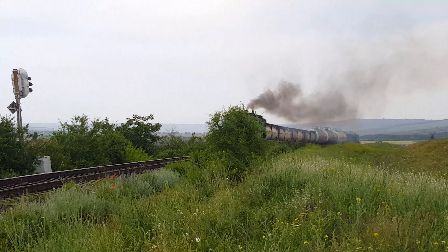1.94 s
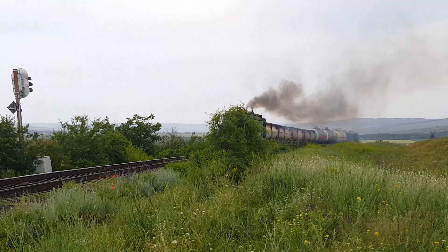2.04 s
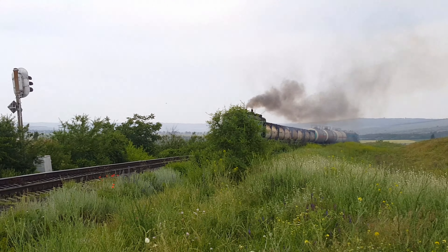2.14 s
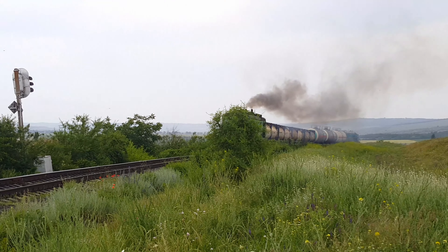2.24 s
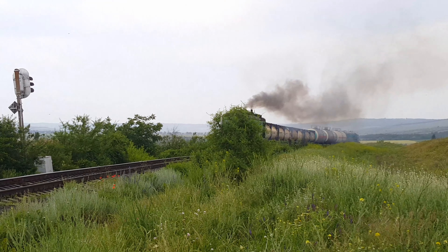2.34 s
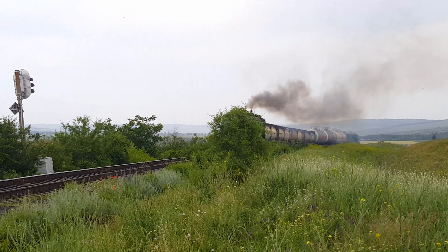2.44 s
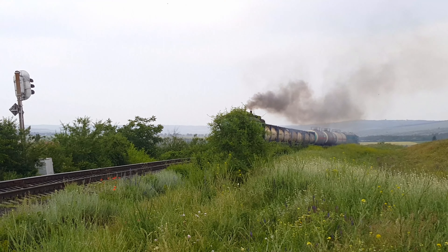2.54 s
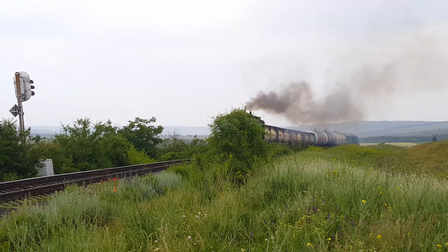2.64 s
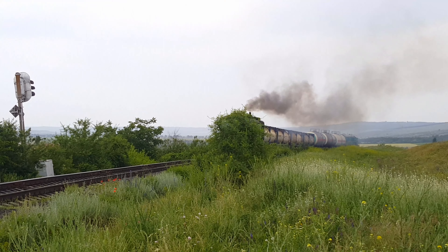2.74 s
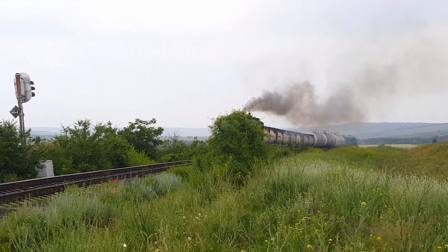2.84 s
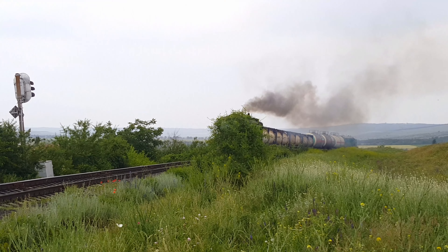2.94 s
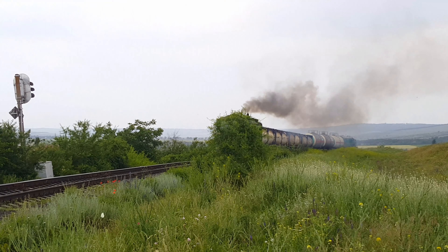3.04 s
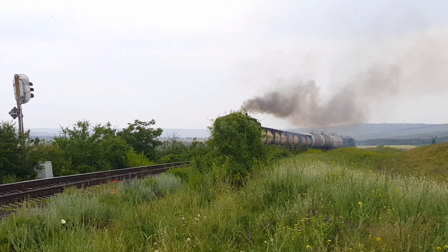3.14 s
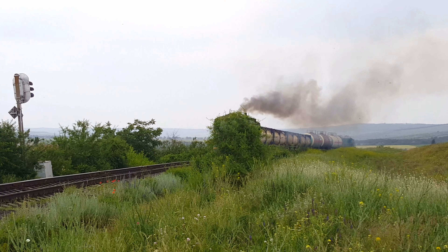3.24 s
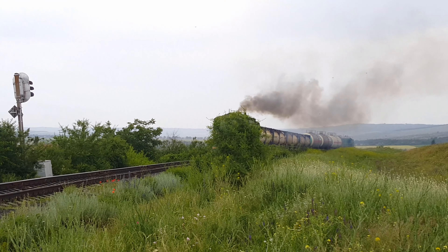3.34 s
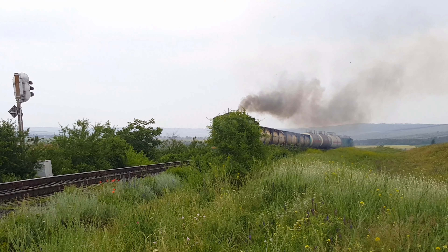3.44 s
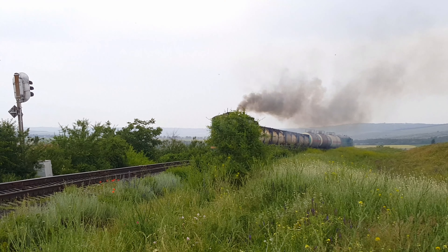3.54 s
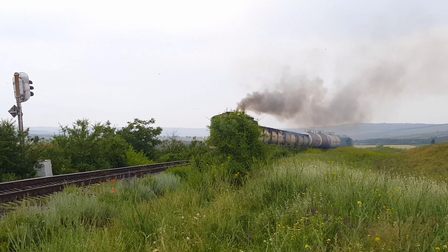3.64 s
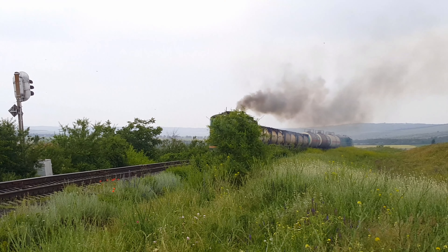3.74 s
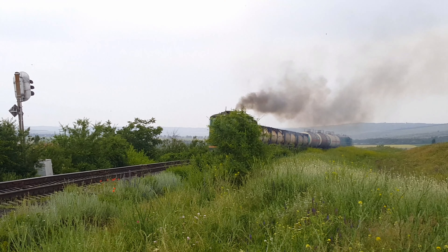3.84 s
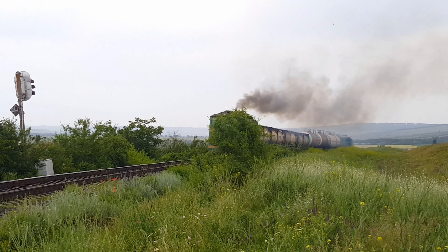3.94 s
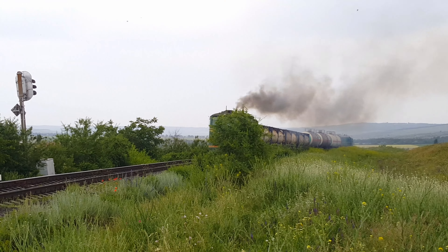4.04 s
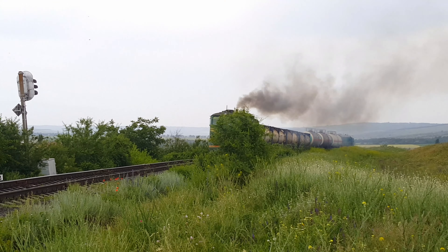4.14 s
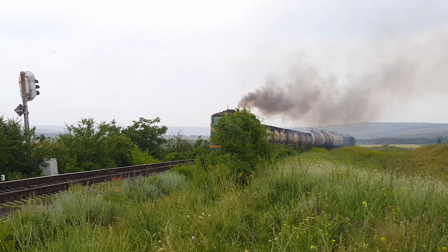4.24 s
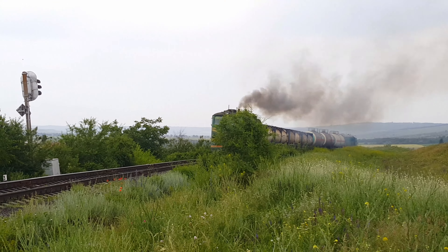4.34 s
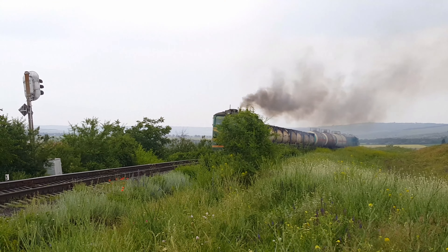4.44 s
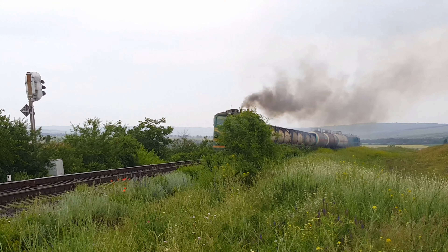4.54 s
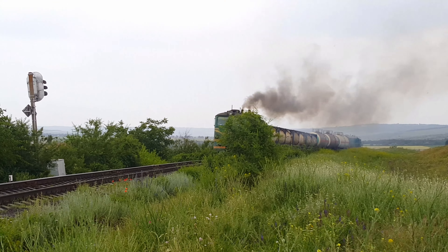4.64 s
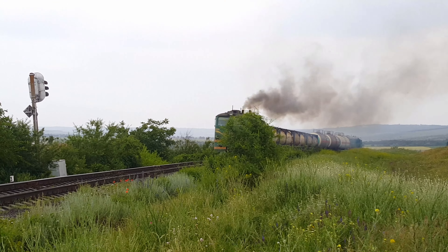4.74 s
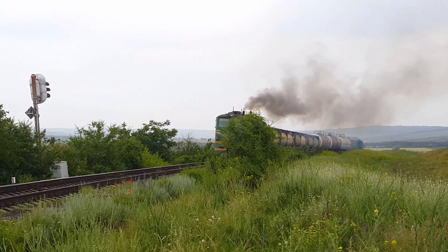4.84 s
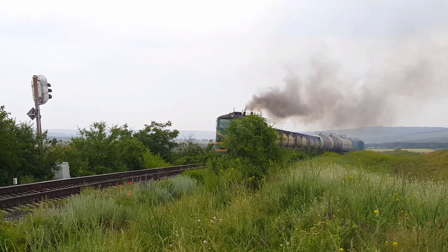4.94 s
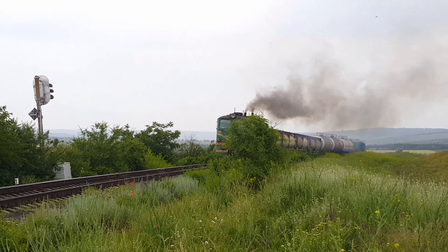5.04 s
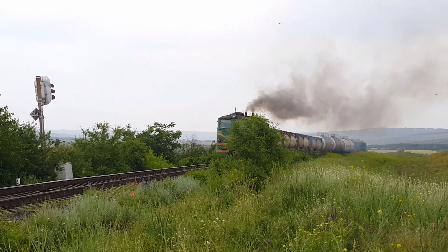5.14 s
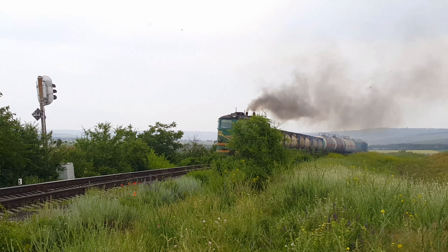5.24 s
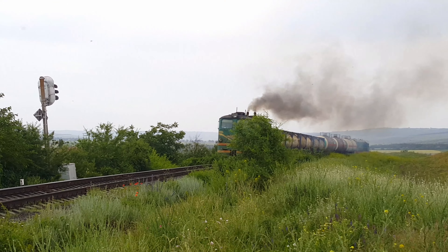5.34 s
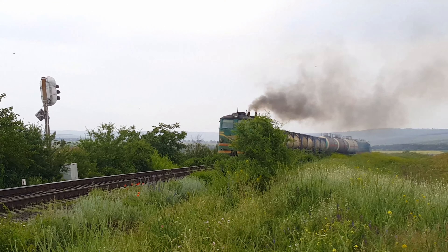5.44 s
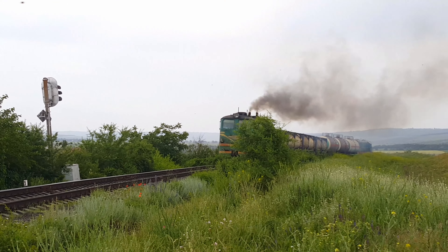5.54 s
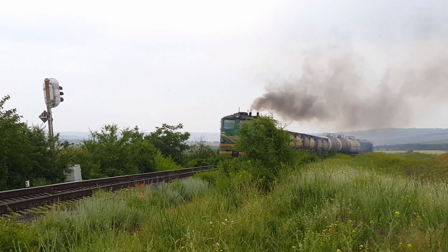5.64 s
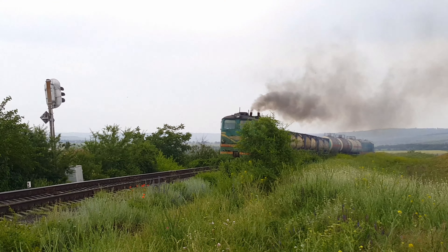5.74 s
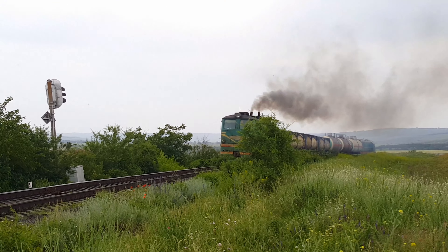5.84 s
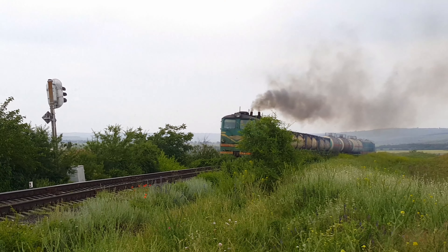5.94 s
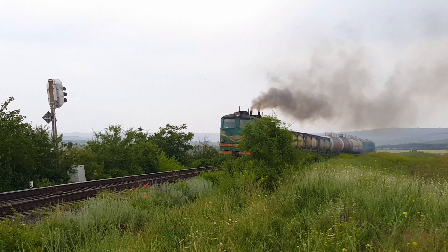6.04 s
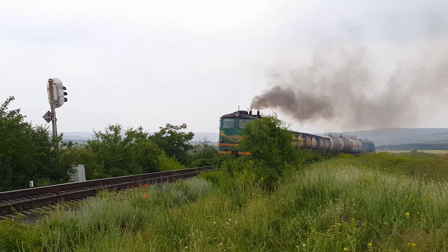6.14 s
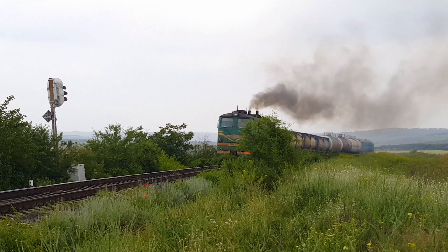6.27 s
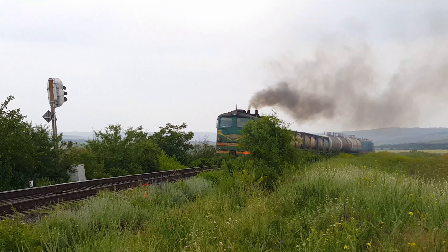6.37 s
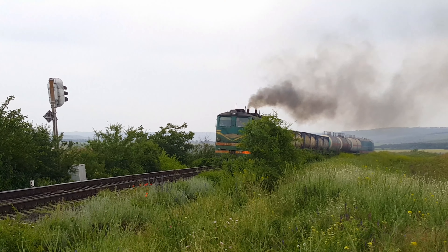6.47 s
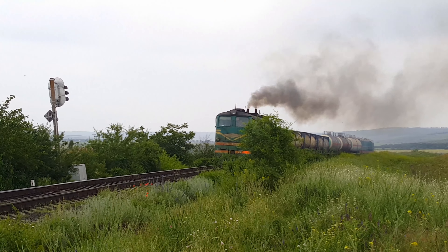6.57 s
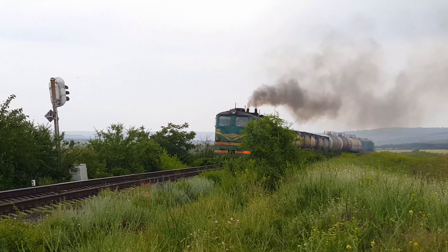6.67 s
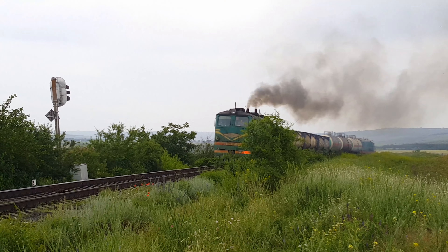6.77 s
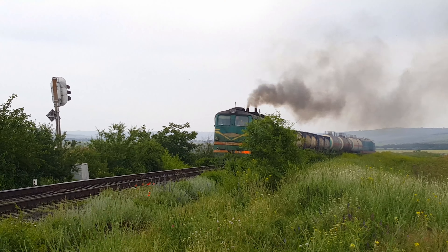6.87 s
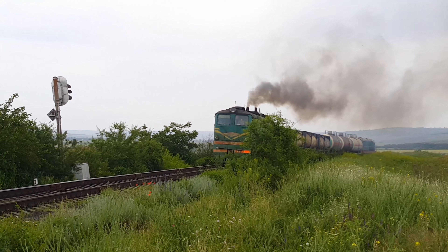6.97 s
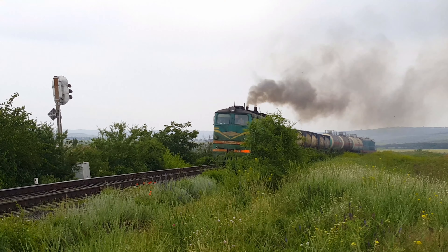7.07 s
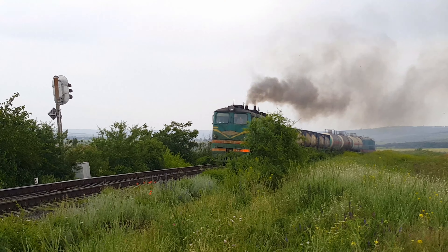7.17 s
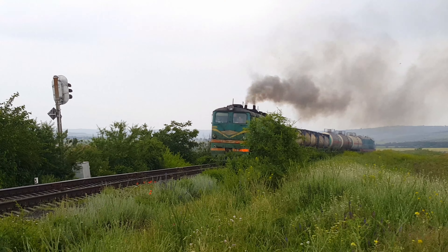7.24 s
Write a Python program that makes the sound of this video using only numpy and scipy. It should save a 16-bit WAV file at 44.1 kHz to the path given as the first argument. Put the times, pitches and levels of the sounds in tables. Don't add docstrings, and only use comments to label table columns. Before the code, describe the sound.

Continuous low throbbing of a big diesel engine on a freight train, already running at the start and gradually growing louder. The load eases near the middle, then pulls again. Fast casing knocks ring dully, wavering whines and whistles surface briefly, and exhaust hiss pulses with the beats. Sizzling leaking air jumps out in short patches, then stays open. Distant, dry open-field stereo pickup, no horn.

```python
import sys
import numpy as np
from scipy import signal
from scipy.fft import rfft, irfft, next_fast_len
from scipy.io import wavfile
from scipy.ndimage import uniform_filter1d

SR = 44100
rng = np.random.default_rng(int(sys.argv[2]) if len(sys.argv) > 2 else 0)


def master(y):
    cut = np.clip(np.atleast_2d(y).T, -1, 1)
    pcm = np.round(cut * 32767)
    wavfile.write(sys.argv[1], SR, pcm.astype(np.int16))


def rack_gain(trim_db):
    fader = np.asarray(trim_db, float)
    return 10 ** (fader / 20)


N = 362061
T = np.arange(N) / SR


def evened(x):
    return x / np.sqrt(np.mean(x ** 2) + 1e-20)


def read(points, hz):
    f, value = np.transpose(points)
    return np.interp(np.log(hz + 1), np.log(f + 1), value)


def curve(rows, column=1):
    rows = np.array(rows)
    return np.interp(T, rows[:, 0], rows[:, column])


def wander(per_s):
    t = T[::256]
    rates = np.geomspace(per_s / 20, per_s, 20)
    slow = sum(np.sin(2 * np.pi * (f * t + rng.random())) / np.sqrt(f) for f in rates)
    return np.interp(T, t, evened(slow))


def swells(rows, quiet_db):
    gain = rack_gain(quiet_db)
    for middle, spread, db in rows:
        gain = gain + rack_gain(db) * np.exp(-.5 * ((T - middle) / spread) ** 2)
    return gain


def resonate(x, hz, width):
    turn, r = np.exp(2j * np.pi * hz * T), np.exp(-np.pi * width / SR)
    return 2 * (turn * signal.lfilter([1 - r], [1, -r], x / turn)).real


# (frequency [Hz], lead [rad])
PORT_LEAD = [(0, 0.24), (860, -0.148), (1120, 1), (1380, -1.1), (1720, 0.92), (2150, -1.18), (2500, 1),
             (2760, 0.052), (3190, -1.1), (3450, -0.87), (5510, 0.67), (8700, -0.37), (9910, 1),
             (15200, 0.39)]
# (frequency [Hz], difference [dB])
PORT_LEAN = [(60, 1.0), (110, 1.0), (200, 0.5), (380, 0.5), (700, 2), (1290, 1.5), (2380, 4), (4400, -2),
             (8120, 1.5), (15000, 3.5)]


def half_difference(hz):
    return rack_gain(read(PORT_LEAN, hz) / 2) * np.exp(.5j * read(PORT_LEAD, hz))


def ports(x):
    size = next_fast_len(N + SR)
    half = half_difference(np.fft.rfftfreq(size, 1 / SR))
    x = np.pad(x, (0, size - N), "linear_ramp", end_values=x[0])
    return irfft(rfft(x) * np.array([half, 1 / half]), size)[:, :N]


# (frequency [Hz], left-right likeness [0-1])
COHERENCE = [(60, 0.7), (130, 1.0), (290, 1), (640, 1), (1410, 0.75), (3100, 1), (6820, 0.4),
             (15000, 0.044)]


def noise(spectrum, patchy_db, likeness=1):
    frames, hz = N // 256 + 5, np.fft.rfftfreq(1024, 1 / SR)
    a, b, c, d, patches = rng.standard_normal((frames, 513, 5)).T
    patches = uniform_filter1d(patches, size=10, axis=0)
    patches = evened(uniform_filter1d(patches, size=12, axis=1))
    same = np.clip(likeness * read(COHERENCE, hz), -1, 1)[:, None]
    left = a + 1j * b
    right = same * left + np.sqrt(1 - same ** 2) * (c + 1j * d)
    half = half_difference(hz)[:, None]
    z = np.array([left * half, right / half])
    z *= rack_gain(read(spectrum, hz)[:, None] + patchy_db * patches)
    return evened(signal.istft(z, nperseg=1024, noverlap=768)[1][:, :N])


START_M, CLOSING_M_PER_S = 157, 6.84


def near_db():
    db = -20 * np.log10(START_M - CLOSING_M_PER_S * T)
    return db - db.mean()


# (time [s], speed [turns/s])
SHAFT = [(0.0, 9.4258), (0.75, 9.4566), (1.49, 9.4735), (2.24, 9.4906), (2.99, 9.5051), (3.73, 9.5237),
         (4.48, 9.5224), (5.22, 9.5334), (5.97, 9.5312), (6.72, 9.534), (7.46, 9.5368), (8.21, 9.5256)]


def shaft_turns():
    return np.cumsum(curve(SHAFT)) / SR


# (crank angle [deg], beat strength [dB])
CYLINDERS = [(54.2, -3.9), (79.6, -3.2), (115.8, -19.7), (143.5, -13.2), (177.7, -2.1), (185.0, -6.2),
             (211.9, 0.0), (260.4, -1.9), (282.9, -6.3), (294.0, -2.0)]


def timing(k):
    angle, beat_db = np.transpose(CYLINDERS)
    return np.angle(np.sum(rack_gain(beat_db) * np.exp(-2j * np.pi * k * angle / 360)))


# (multiple of shaft speed [1], rms level [dB])
ORDERS_DB = [(4, -56.6), (5, -47.2), (6, -39.7), (7, -18.4), (8, -35.8), (9, -28.8), (10, -25.0),
             (11, -39.8), (12, -29.6), (13, -18.0), (14, -31.5), (15, -36.2), (16, -26.4), (17, -32.4),
             (18, -35.4), (19, -39.7), (20, -39.8), (21, -46.3), (22, -43.2), (23, -51.2), (24, -31.6),
             (25, -37.6), (26, -40.1), (27, -40.7), (28, -37.5), (29, -40.0), (30, -58.9), (31, -51.2),
             (32, -46.2), (33, -49.3)]
DRONE_HZ = [67, 124, 152, 250]
NEAR_SHARE = [1, 1.67, 1.85, 0.23]
SURGE_SHARE = [1.01, -0.6, 0.1, 0.65]
# (time [s], surge [dB])
SURGE = [
    (0, -0.5),
    (1.2, 0),
    (1.8, -1.5),
    (3.5, -4),
    (4, -2),
    (4.6, -2.5),
    (5.9, -0.5),
    (6.6, -3.5),
    (7.3, -1.5),
    (8.21, -1.5),
]


def exhaust(turns):
    swell_db = np.outer(NEAR_SHARE, near_db()) + np.outer(SURGE_SHARE, curve(SURGE))
    swell_db -= swell_db.mean(1, keepdims=True)
    out = np.zeros(N)
    for k, db in ORDERS_DB:
        share = [read(list(zip(DRONE_HZ, row)), k * SHAFT[0][1]) for row in np.eye(len(DRONE_HZ))]
        flutter_db = .8 * wander(5.0)
        gain = np.sqrt(2) * rack_gain(db + share @ swell_db + flutter_db)
        out += gain * np.cos(2 * np.pi * k * turns + timing(k))
    return out


# (multiple of shaft speed [1], rms level [dB])
REAR_TONES = [(7, -41), (10, -43), (13, -33.5)]
REAR_AHEAD, REAR_SLIP, REAR_SLIP_GROWTH = .07, .1154, .00923


def rear_unit(turns):
    behind = turns + REAR_AHEAD - REAR_SLIP * T - REAR_SLIP_GROWTH * T ** 2 / 2
    return sum(np.sqrt(2) * rack_gain(db) * np.cos(2 * np.pi * k * behind + timing(k)) for k, db in REAR_TONES)


# (frequency [Hz], density [dB/Hz])
RUMBLE = [(20, -22.5), (45, -6.5), (60, -10), (115, 2.5), (160, -8.5), (230, -6.5), (280, -12.5),
          (350, -24), (500, -43)]


def rumble():
    hz = np.fft.rfftfreq(N, 1 / SR)
    shaped = rfft(rng.standard_normal(N)) * rack_gain(read(RUMBLE, hz)) * (hz < 600)
    level_db = -29.5 + NEAR_SHARE[1] * near_db() + 2.3 * wander(0.97)
    return rack_gain(level_db) * evened(irfft(shaped, N))


# (crank angle [deg], blow [dB])
KNOCKS = [(49.2, -19.6), (95.4, 0.0), (108.2, -2.7), (146.2, -9.5), (170.1, -13), (211.6, -11),
          (239.2, -15.3), (294.3, -13), (325.9, -11), (344.3, -8.2)]
# (frequency [Hz], width [Hz], level [dB])
CASING = [(657, 18, -16), (772, 15, -25.5), (902, 51, -3.5), (915, 60, 0.0), (975, 22, -15.6)]
# (time [s], level [dB])
RING = [(0, -37.5), (1, -37.5), (2.1, -36.5), (3.3, -38), (4.4, -35.5), (5.5, -36), (6.3, -34),
        (7.2, -39.5), (8.21, -40)]


def knocks(turns):
    blows = np.zeros(N)
    for angle, db in KNOCKS:
        struck = np.diff(np.floor(turns - angle / 360)) > 0
        blows[np.flatnonzero(struck)] += rack_gain(db)
    blows *= rack_gain(.6 * wander(12.0))
    modes = []
    for hz, width, db in CASING:
        ring = resonate(resonate(blows, hz, width), hz, 3 * width)
        modes.append(rack_gain(db) * ring / width)
    return rack_gain(curve(RING) + 1.0) * evened(sum(modes[::2]) - sum(modes[1::2]))


def throb(turns):
    peak_deg = 172
    return np.cos(2 * np.pi * 7 * (turns - peak_deg / 360))


# (time [s], rms level [dB])
GEAR = [(0, -46), (3, -42), (8.21, -40.5)]
WHINE_ORDERS = [190.1, 217.6, 501.6, 530]
# (middle [s], spread [s], rms level [dB])
SINGING = [
    [(1.2, .15, -52), (2.4, .25, -45), (3.2, 0.1, -48), (6.4, 0.55, -51.5)],
    [(.7, 0.12, -47), (1.95, 0.26, -45.5), (3.6, 0.36, -50), (4.8, 0.33, -48), (6.7, 0.46, -47),
     (7.7, 0.18, -49)],
    [(.1, .4, -62), (2, 0.27, -64), (4.4, 0.17, -52.5), (3.7, 0.27, -59), (5.2, 0.64, -58),
     (7.3, 0.17, -53)],
    [(5.8, .12, -60), (7.15, 0.26, -52.5), (7.8, 0.19, -51.5)],
]
QUIET_DB = [-62, -54, -71.5, -74]
THROB_DB = [3, 0, 6, 5]


def whines(turns):
    timing_gear_teeth = 49
    out = rack_gain(curve(GEAR) - 1 + 1.2 * wander(9.0)) * np.cos(2 * np.pi * timing_gear_teeth * turns)
    for order, songs, quiet_db, depth_db in zip(WHINE_ORDERS, SINGING, QUIET_DB, THROB_DB):
        waver = rack_gain(1.5 * wander(12.0) + depth_db * throb(turns))
        out += swells(songs, quiet_db) * waver * np.cos(2 * np.pi * order * turns)
    partial = np.cos(2 * np.pi * 1.5 * WHINE_ORDERS[1] * turns)
    out += swells(SINGING[1], QUIET_DB[1]) * rack_gain(-9.5) * partial
    return np.sqrt(2) * out


# (frequency [Hz], density [dB/Hz])
ROAR = [(250, -7.5), (330, 1.5), (450, 0), (540, 3), (720, 4.5), (850, 2.2), (1000, 0.5), (1300, -46.5)]


def roar(pulse):
    return rack_gain(-33.5 + 1.7 * near_db() + 0.17 * pulse) * noise(ROAR, patchy_db=1.0, likeness=0.93)


# (frequency [Hz], density [dB/Hz])
UPPER = [(800, -9.5), (1050, 3), (1250, 1.5), (1450, -3.5), (1880, 0), (2120, -10), (2230, -32),
         (3000, -61.5)]
# (middle [s], spread [s], level [dB])
CARRIED = [
    (1.3, 0.3, -41.5),
    (2.1, 0.18, -44.5),
    (3.1, 0.36, -44),
    (3.9, 0.29, -42.5),
    (6.6, 0.51, -46),
    (7.7, 0.26, -44),
]


def upper_roar(pulse):
    gain = swells(CARRIED, quiet_db=-38.5) * rack_gain(.5 * near_db() + 0.64 * pulse)
    return gain * noise(UPPER, patchy_db=1.0, likeness=1.21)


# (frequency [Hz], density [dB/Hz])
JET = [(1000, -32), (1800, 4), (2210, 1), (2600, 3), (3750, 0), (4200, -7.5), (4750, -9), (5200, -9),
       (6500, -20), (8500, -20), (9500, -49.5)]
# (time [s], level [dB])
SIGHT = [(0, -47.5), (.75, -45.5), (1.05, -44), (1.35, -39), (1.58, -39.5), (1.73, -38.5), (2.05, -43),
         (2.2, -45.5), (2.9, -41.5), (3.12, -38), (3.65, -42.5), (4.6, -40), (5.49, -43.5), (5.85, -38.5),
         (6.2, -45), (6.52, -37.5), (7.75, -41), (8.21, -38.5)]


def jet(pulse):
    level_db = curve(SIGHT) + 2.5 + 1.13 * wander(24.0) + 1.1 * pulse
    return rack_gain(level_db) * noise(JET, patchy_db=1.0, likeness=0.93)


# (frequency [Hz], density [dB/Hz])
WHISTLE = [(3400, -27), (3750, -4), (3950, -6.5), (4300, -23), (4640, 2.5), (4780, -5), (4880, -4.5),
           (5050, -39.5)]
# (middle [s], spread [s], level [dB])
WHISTLES = [(.15, 0.14, -52.5), (.85, 0.18, -47.5), (1.4, 0.12, -43), (1.8, 0.16, -43.5),
            (3.65, 0.23, -49.5), (4.4, .3, -43.5), (5.1, 0.23, -50.5), (5.65, .25, -50), (6.75, .2, -44),
            (7.35, .2, -51), (7.9, 0.28, -50.5)]


def whistle(turns):
    gain = swells(WHISTLES, quiet_db=-56.5) * rack_gain(1.1 * wander(14.0) - 4.0 + 1.5 * throb(turns))
    return gain * noise(WHISTLE, patchy_db=-0.5)


# (start [s], length [s], entering level [dB], leaving level [dB])
GAPS = [(1.272, .32, -55.5, -52.5), (1.654, 0.19, -50.5, -53), (2.334, 0.092, -57, -58),
        (2.618, .06, -50, -52.5), (2.734, 0.072, -55.5, -54.5), (2.968, .59, -57, -49.5),
        (3.931, .1, -52, -54), (4.048, .55, -59.5, -48), (4.597, 0.43, -48.5, -57.5),
        (5.197, 0.22, -57, -58.5), (5.634, .39, -46, -45.5), (6.2, 0.26, -54.5, -58.5),
        (6.43, 1.9, -44.5, -44.5)]


def leak_db():
    hidden_db, gap_edge_s = -59.5, 0.05
    power = rack_gain(2 * (hidden_db + near_db()))
    for start, length, in_db, out_db in GAPS:
        end = start + length
        inside = np.clip(np.minimum(T - start, end - T) / gap_edge_s + .5, 0, 1)
        power = power + inside ** 2 * rack_gain(2 * np.interp(T, [start, end], [in_db, out_db]))
    return 10 * np.log10(power)


# (frequency [Hz], density [dB/Hz])
AIR = [(2500, -15), (4200, 2), (4900, -2.5), (5120, 8.5), (5500, 0), (5950, 4), (6500, -6), (6900, 1.5),
       (7300, -0.5), (8410, 0), (9300, -7.5), (10500, -39)]


def air_leak(leak, pulse):
    return rack_gain(leak + 3.0 + 0.49 * pulse) * noise(AIR, patchy_db=2.0, likeness=1.34)


# (frequency [Hz], density [dB/Hz])
FIZZ = [(8000, -26), (9500, 2), (12000, -3), (14000, -4.5), (15600, -6)]


def fizz(leak, pulse):
    return rack_gain(1.5 * (leak + 47.0) - 57 + .7 * pulse) * noise(FIZZ, patchy_db=1.0, likeness=1.4)


def scene():
    turns = shaft_turns()
    late = turns + .0012 * wander(1.2) + .0002 * wander(15.0)
    drone = exhaust(turns)
    pulse = drone / np.sqrt(uniform_filter1d(drone ** 2, size=9000))
    leak = leak_db()
    engine = ports(drone + rear_unit(turns) + rumble() + knocks(late) + whines(late))
    exhaust_noise = roar(pulse) + upper_roar(pulse) + jet(pulse)
    return engine + exhaust_noise + whistle(late) + air_leak(leak, pulse) + fizz(leak, pulse)


# (frequency [Hz], density [dB/Hz])
SELF = [(5000, -26), (10500, -14.5), (13700, -17), (14400, -4), (14800, 0.5), (15300, -4), (16000, -9)]


def microphone_hiss():
    return rack_gain(-64) * noise(SELF, patchy_db=0.5, likeness=.3)


def top_cut(x):
    return signal.sosfilt(signal.butter(12, 15630, fs=SR, output="sos"), x)


def record(dry):
    mix = dry + microphone_hiss() - .0012
    return top_cut(mix)


dry = scene()
out = record(dry)
master(out)
```